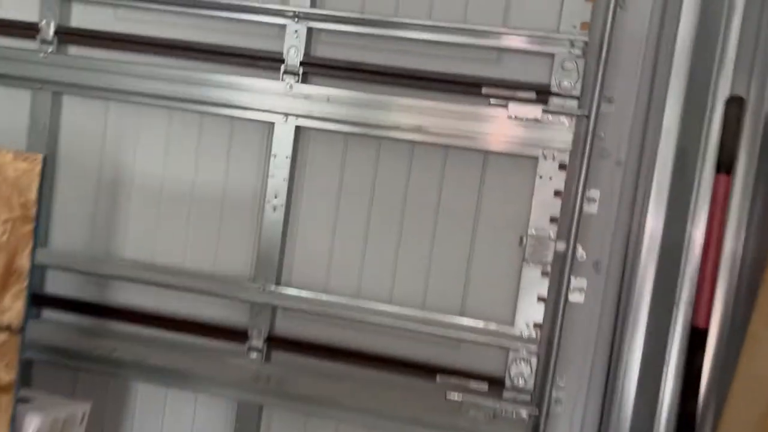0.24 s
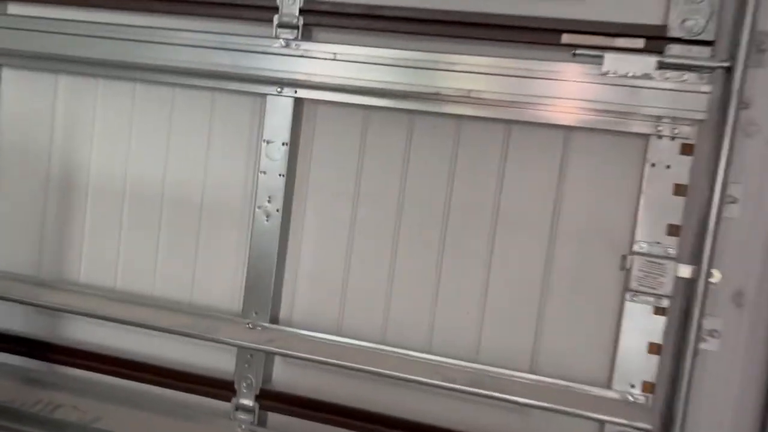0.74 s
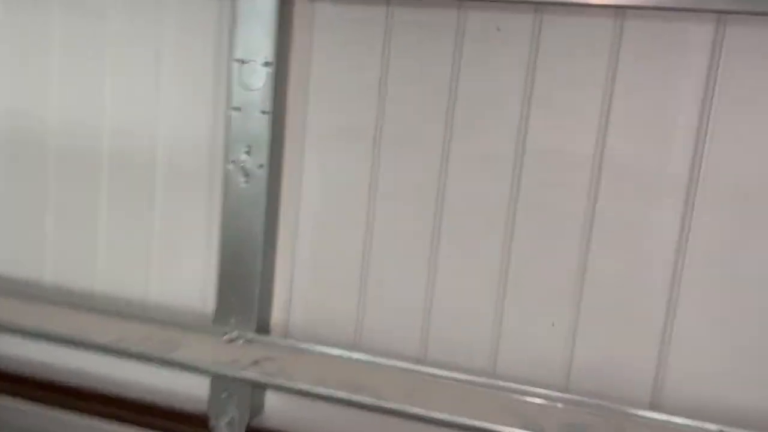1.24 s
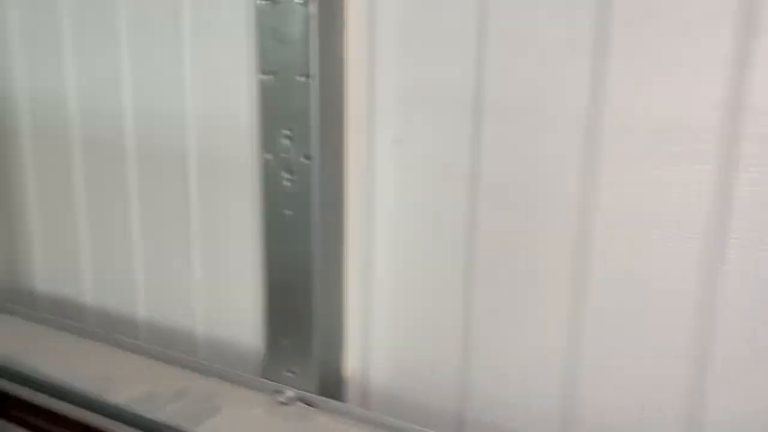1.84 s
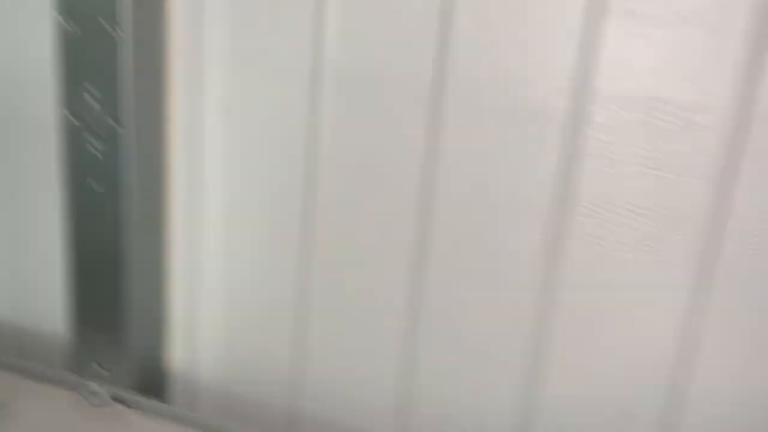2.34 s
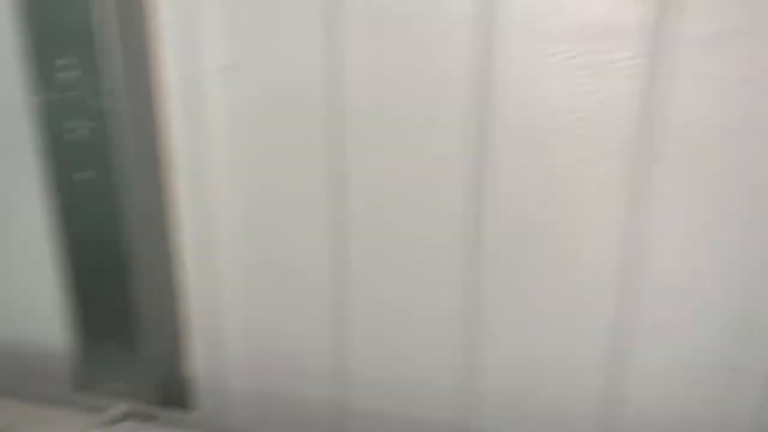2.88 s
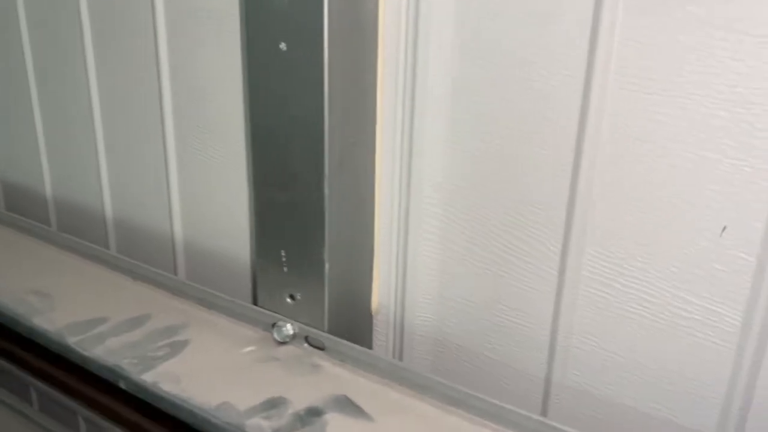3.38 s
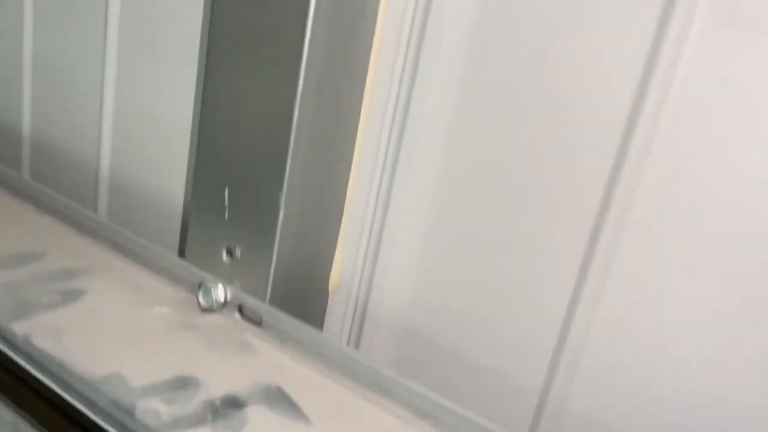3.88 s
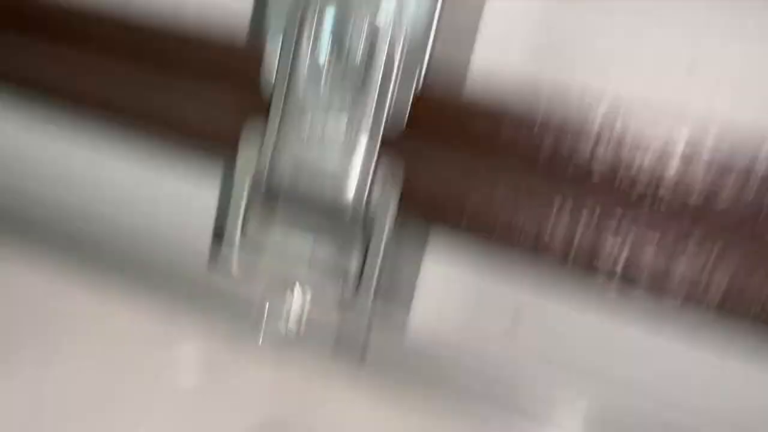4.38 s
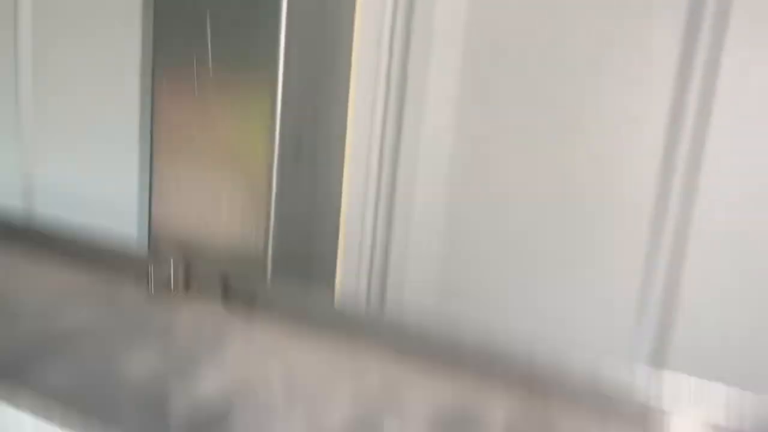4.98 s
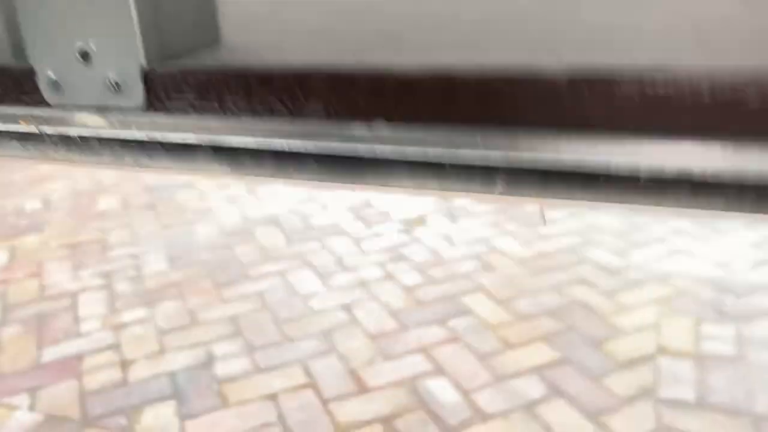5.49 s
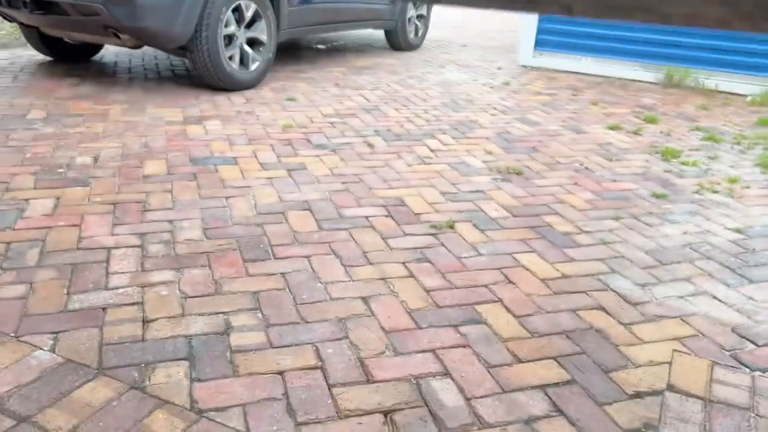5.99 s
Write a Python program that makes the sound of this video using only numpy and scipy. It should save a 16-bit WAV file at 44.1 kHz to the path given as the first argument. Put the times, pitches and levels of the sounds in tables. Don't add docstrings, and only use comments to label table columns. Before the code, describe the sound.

Close handheld stereo capture in a hard, fairly small garage: soft footfalls, clothes rustle and bright key jingles come first. Light bolt knocks lead to one very hard double clank with a short squeal. Then the metal door rolls upward in uneven, rattling lurches, loudest in the middle, with hollow booms, hinge hits and dry squeaks. It quiets to a faint scrape and a few key tinkles before bumping again at the end.

```python
import sys
import numpy as np
from scipy import signal
from scipy.fft import rfft, irfft, next_fast_len
from scipy.io import wavfile
from scipy.ndimage import uniform_filter1d, map_coordinates

SR = 44100
rng = np.random.default_rng(int(sys.argv[2]) if len(sys.argv) > 2 else 0)


def level_to_linear(level):
    exponent = np.asarray(level, float) / 20
    return 10 ** exponent


def to_wav(sig):
    pcm = np.clip(np.atleast_2d(sig), -1, 1) * 32767
    pcm = np.round(pcm).astype(np.int16)
    wavfile.write(sys.argv[1], SR, pcm.T)


N = 274743


def unit(x):
    return x / np.sqrt(np.mean(x ** 2) + 1e-20)


def along(points, hz):
    f, v = np.transpose(points)
    return np.interp(np.log(hz + 1), np.log(f + 1), v)


def wobble(rate_hz):
    knots = rng.standard_normal(int(N * rate_hz / SR) + 4)
    return map_coordinates(knots, [np.arange(N) * rate_hz / SR])


def filtered(x, response):
    size = x.shape[-1]
    m = next_fast_len(size + 4096)
    return irfft(rfft(x, m) * response(np.fft.rfftfreq(m, 1 / SR)), m)[..., :size]


def resonances(modes, f):
    return sum(level_to_linear(2 * db) * (f * w) ** 2 / ((c * c - f * f) ** 2 + (f * w) ** 2 + 1) for c, w, db in modes)


def rush(spectrum, modes=(), bumps=1, size=N, sheet_db=0):
    sheet = level_to_linear(1.6 * sheet_db * np.tanh(rng.standard_normal(SR // 40)))

    def colour(f):
        smooth = np.sqrt(level_to_linear(2 * along(spectrum, f)) + resonances(modes, f))
        return smooth * np.interp(f / 30, np.arange(len(sheet)), sheet)

    return unit(filtered(bumps * rng.standard_normal((2, size)), colour))


def add(track, s, sound):
    part = track[:, round(s * SR):round(s * SR) + sound.shape[1]]
    part += sound[:, :part.shape[1]]


def swells(s, db, t60, rise, hold=0):
    t = np.arange(0, N / SR + .002, .001)[:, None]
    before = np.maximum(s - t, 0) / np.abs(rise)
    after = np.maximum(t - s - np.abs(hold), 0) / np.maximum(t60, .02)
    power = level_to_linear(2 * (db - 60 * (before + after))).sum(axis=1)
    return np.interp(np.arange(N) / SR, t[:, 0], np.sqrt(power))


# frequency in Hz, t60 in s.
GARAGE_T60 = [(200, 0.51), (600, 0.91), (3500, 0.45), (10000, 0.38)]


def garage(x):
    hz, t, z = signal.stft(rng.standard_normal((2, SR // 2)), SR, nperseg=256)
    tail = signal.istft(z * level_to_linear(-60 * t / along(GARAGE_T60, hz)[:, None]), SR, nperseg=256)[1]
    return signal.fftconvolve(x, tail / np.linalg.norm(tail[0]), axes=1)[:, :N]


# time in s, level in dB.
FOOTFALLS = [(0.0, -47.5), (0.11, -39.5), (0.16, -32), (0.36, -43.5), (0.66, -51), (1.32, -52),
             (1.52, -40.5), (1.77, -40.5), (1.87, -39), (1.98, -38.5), (2.09, -42), (3.2, -32)]
# time in s, level in dB, rustle over it in dB, t60 in s.
SCUFFS = [
    (0.0, -55.5, -11.5, 0.84),
    (0.404, -58.5, -6.5, 0.82),
    (0.54, -49, -7, 0.44),
    (0.734, -60, -2, 0.34),
    (1.02, -54, -11.5, 2),
    (1.235, -52.5, 0.5, 0.16),
    (1.83, -51.5, -8, 0.92),
    (1.53, -47, 4, 0.43),
    (1.865, -53, -6, .2),
]
QUIET_DB = (-56.5, -65.5, -70.5)
THUD_T60_S, SETTLE_S, BRUSH_S = 0.4, 0.14, 0.24


def walker():
    s, db = np.transpose(FOOTFALLS)
    when, scuff_db, rustle_db, t60 = np.transpose(SCUFFS)
    thud = swells(s, db, THUD_T60_S, SETTLE_S)
    soles = swells(when, scuff_db, t60, BRUSH_S)
    clothes = swells(when, scuff_db + rustle_db, t60, BRUSH_S)
    return [np.hypot(move, level_to_linear(quiet)) for move, quiet in zip((thud, soles, clothes), QUIET_DB)]


# frequency in Hz, density in dB per Hz.
THUD = [(20, -21), (40, -3), (65, 7.5), (130, -5.5), (200, -19), (350, -52)]
SHUFFLE = [(100, -10), (250, -2), (600, -8.5), (1500, -15), (2500, -32.5)]
RUSTLE = [(900, -27), (2000, 4), (5000, -3.5), (9000, -9.5), (16000, -18.5)]
# time in s, peak in dB.
HEELS = [
    (0.409, -62),
    (0.43, -42),
    (0.519, -38.5),
    (1.018, -36.5),
    (1.119, -37),
    (1.224, -43),
]
HEEL_T60_S = 0.15


def walking():
    thud, shuffle, rustle = walker()
    scuff, t = wobble(29.58), np.arange(SR // 5) / SR
    track = thud * rush(THUD)
    track += shuffle * rush(SHUFFLE, bumps=level_to_linear(3.2 * scuff))
    track += rustle * rush(RUSTLE, bumps=level_to_linear(2.8 * scuff))
    for s, db in HEELS:
        tap = rush([(150, -17), (350, 8), (1100, -6.5), (1600, -40)], size=len(t), sheet_db=8.5)
        tap = level_to_linear(db - 8.0 - 60 * t / HEEL_T60_S) * tap
        grit = level_to_linear(db - 25 - 60 * t / .03) * rush(RUSTLE, size=len(t))
        add(track, s - .002, tap + grit)
    return track


# time in s, peak in dB, low modes in dB, top modes in dB.
JINGLES = [(0.0094, -58, -13, -5), (0.1374, -52, -27, 2), (0.2448, -61, -17, 1), (0.2825, -50, -4, 3),
           (0.406, -33, -18, -15), (0.5566, -44.5, -10, -4), (0.601, -44, -11, 1), (0.6254, -40, -13, 2),
           (0.6639, -50, -21, -15), (0.69, -47, -16, -16), (0.734, -33, -12, -1), (0.77, -38.5, -13, -5),
           (0.7994, -46, -11, -3), (0.855, -37.5, -13.5, -10), (1.0231, -46.5, -22, -2),
           (1.1373, -51, -3, 6.5), (1.201, -51, -2, -15), (1.2942, -45, -6, -10), (1.6584, -57, -14, 3),
           (1.674, -44.5, -12, -15), (1.7746, -29.5, -21, 3), (5.558, -52, -16, -11),
           (5.5792, -55, -5, -11), (5.6665, -51, -17, -10), (5.7219, -48, -12, 4), (5.7728, -59, -6, -7)]
KEY_HZ = [4600, 5850, 6530, 7730, 9150, 9620, 10090, 11320, 11640, 12400, 13280, 13710, 14300, 15080, 15310,
          15690]
# level in dB, t60 in s.
KEY_RING = [(-17, 0.098), (-24, .1), (0.5, 0.072), (-4, 0.091), (-6, 0.089), (-14, 0.1), (1, 0.068),
            (-1, 0.075), (-5, 0.041), (-22, .1), (-2, 0.18), (-4, 0.14), (-19, 0.13), (5.5, 0.2), (-14, .1),
            (-3, 0.19)]


def keys():
    track, t = np.zeros((2, N)), np.arange(SR // 5) / SR
    hz = np.array(KEY_HZ)[:, None]
    level_db, t60 = np.transpose(KEY_RING)[:, :, None]
    for s, db, low_db, top_db in JINGLES:
        size, detune = rng.standard_normal((2, len(hz), 1))
        part_db = np.where(hz < 8500, low_db, np.where(hz > 14700, top_db, 0))
        fade = level_to_linear(part_db + level_db + 3.6 * size - 60 * t / t60)
        ring = (fade * np.sin(2 * np.pi * hz * (1 + 0.0028 * detune) * t)).sum(axis=0)
        ring[:4] += 3.0 * np.array([1, -3, 3, -1])
        spray = level_to_linear(-60 * t / 0.16) * rng.standard_normal((2, len(t))) * (rng.random(len(t)) < .03)
        spray[:, 0] = 1.54
        jingle = signal.fftconvolve(spray, ring[None], axes=1)[:, :len(t)]
        add(track, s - .001, level_to_linear(db - 15.5) * jingle * np.cos(np.pi / 2 * t / t[-1]))
    return track


# time in s, t60 in s, frequency in Hz, width in Hz,
# level in dB.
SQUEAKS = [(2.236, 0.045, 2590, 50, -12), (2.249, 0.046, 5620, 170, -13), (3.077, 0.27, 2794, 140, -31),
           (3.085, .15, 3800, 140, -47), (5.727, 0.35, 290, 38, -24), (3.296, 0.17, 1251, 215, -20.5),
           (2.243, 0.51, 1051, 173, -17), (2.97, 0.53, 560, 51, -26.5), (4.442, 0.073, 5550, 160, -24.5),
           (4.545, 0.19, 2170, 90, -22.5), (4.83, 0.2, 2660, 110, -23.5), (4.89, 1, 2620, 200, -37.5),
           (4.839, 0.16, 3080, 115, -29.5), (5.292, 0.4, 6900, 200, -41), (5.33, 0.29, 7800, 970, -40.5),
           (5.321, 0.18, 4500, 300, -55), (5.435, 0.33, 3050, 45, -51), (5.2, .4, 2330, 50, -47),
           (5.31, 0.26, 1050, 90, -39), (5.0, 0.75, 1100, 190, -33.5), (4.44, .15, 1200, 105, -19.5),
           (1.985, .6, 2000, 90, -42), (4.58, 0.16, 2380, 140, -32), (4.64, 0.67, 3200, 170, -33),
           (4.44, 0.3, 800, 120, -17), (4.721, .2, 3150, 170, -27), (4.77, 0.27, 1350, 66, -21),
           (4.79, 0.072, 5300, 69, -30.5), (4.8, 0.11, 3100, 150, -27), (4.9, 0.077, 2300, 40, -35),
           (5.155, 0.088, 4480, 40, -52), (4.455, .3, 2620, 60, -26), (5.28, 0.29, 4650, 150, -54),
           (5.335, .2, 4200, 149.5, -48), (5.331, .1, 7750, 40, -42), (5.8, 0.072, 6850, 40, -42),
           (1.455, 0.052, 2210, 170, -30.5), (1.455, 0.05, 1355, 89, -30.5), (1.5, 0.12, 880, 91, -30),
              (1.52, 0.094, 1880, 130, -30.5), (1.52, .05, 700, 140, -31.5), (1.45, .05, 570, 90, -27),
              (1.862, .08, 600, 90, -45), (1.862, .07, 1300, 120, -51), (1.976, .12, 770, 75, -27.5),
              (1.976, .1, 1020, 61, -32.5), (2.05, .25, 1600, 70, -40), (2.12, 0.23, 1050, 54, -35.5),
              (2.008, .15, 760, 120, -32), (2.038, 0.11, 740, 98, -33), (2.226, 0.09, 2600, 60, -18),
              (2.254, 0.036, 2586, 49, -10), (2.263, 0.023, 5700, 200, -16.5), (2.252, 0.18, 804, 70, -14),
              (2.282, 0.21, 620.5, 40, -11.5), (2.305, 0.27, 478, 45, -18.5)]
SLIP_RISE_S, SAG_PER_S = 0.012, 0.0303


def squeaks():
    track, t = np.zeros((2, N)), np.arange(SR // 2) / SR
    for s, t60, hz, width_hz, db in SQUEAKS:
        fade = level_to_linear(db - 60 * np.maximum(t - SLIP_RISE_S, 0) / t60)
        swell = np.minimum(t / SLIP_RISE_S, 1) * fade
        drift = np.cumsum(rng.standard_normal((2, len(t))), axis=1) * np.sqrt(2 * np.pi * width_hz / SR)
        add(track, s, swell * np.sin(2 * np.pi * hz * t * (1 - SAG_PER_S * t / 2) + drift))
    return track


# time in s, peak in dB, knock in dB, edge in dB.
BOLT_CLANKS = [(1.451, -29, 4, -28.5), (1.4646, -27.5, 1, -36), (1.51, -26, 2.5, -28),
               (1.529, -23, -1, -27), (1.8569, -45, 6, -32), (1.981, -30, 10, -31.5),
               (2.0534, -22, -5, -30.5), (2.222, -4.5, 2, -30), (2.2467, 0, 5.5, -28.5),
               (2.263, -7.5, 8.5, -9.5), (2.276, -9, -15, -20), (2.6594, -43, 19, -20.5)]
# time in s, peak in dB, knock in dB, edge in dB.
HINGE_CLANKS = [(2.9873, -25, 8, -15), (3.164, -30.5, -5, -30.5), (3.275, -34.5, 4, -43),
                (3.3064, -32, 20.5, -40), (3.351, -21, -15, -19), (3.5877, -29, 1, -33),
                (3.7594, -28.5, 23, -22), (3.916, -37, 9, -27), (4.121, -17.5, 6.5, -33),
                (4.4445, -17, 5, -17), (4.5526, -22, 14, -31), (4.6406, -16, 7.5, -37.5),
                (4.769, -6.5, -4, -26), (4.8098, -20.5, 10.5, -32.5), (4.962, -46, -10, -18),
                (5.029, -45, -10, -24), (4.996, -52, -4, -32), (5.093, -40, -10, -24),
                (5.164, -42, -10, -12), (5.2457, -43, 26, -21.5), (5.721, -24.5, -9, -21.5),
                (5.774, -26.5, -15, -28), (5.8175, -29, -14, -28), (5.877, -40.5, 9, -33),
                (6.0382, -51, 13, -24), (6.161, -35.5, 20, -31), (6.2058, -37, 16, -41)]
CLANK_T60_S, HARD_S_PER_DB, STRONG_S_PER_DB = 0.14, 0.07, -0.02


def clanks():
    track, t = np.zeros((2, N)), np.arange(SR // 5) / SR
    for s, db, knock_db, edge_db in BOLT_CLANKS + HINGE_CLANKS:
        t60 = CLANK_T60_S - HARD_S_PER_DB * (edge_db + 29.0) + STRONG_S_PER_DB * (db + 25.5)
        fade = level_to_linear(db - 13.5 - 60 * t / max(t60, .02)) * (1 - np.exp(-t / 0.00046))
        fade = fade * np.cos(np.pi / 2 * t / t[-1])
        bright = rush([(1200, -18), (2200, 1.0), (8000, -2.0), (10000, -36)], size=len(t), sheet_db=4.0)
        edge = rush([(7000, -14.0), (9000, -0.5), (11500, -2.5), (16000, -19.0)], size=len(t))
        knock = rush([(150, -36), (400, -6.0), (700, 11.5), (1200, 5.5), (1800, -50)],
                     size=len(t), sheet_db=3.0)
        add(track, s - .002, fade * (bright + level_to_linear(edge_db + 21.5) * edge + level_to_linear(knock_db + 1) * knock))
    return track


# time in s, peak in dB, frequency in Hz.
BUMPS = [(2.947, -25, 460), (2.974, -18.5, 505), (3.02, -19.5, 525), (3.125, -25, 560), (3.208, -23.5, 750),
         (3.303, -14.5, 1002), (3.356, -18, 767), (3.476, -20, 557), (3.564, -15.5, 503), (3.624, -20, 511),
         (3.65, -17, 583), (3.699, -23, 580), (3.76, -12.5, 557), (3.835, -13.5, 519), (3.919, -13, 522),
         (4.019, -16, 638), (4.07, -9.5, 603), (4.28, -13, 416), (4.352, -10, 617), (4.446, -8, 511),
         (4.532, -9, 654), (4.636, -10.5, 745), (4.729, -12.5, 716), (4.805, -12.5, 635), (4.978, -19, 650),
         (5.189, -25, 620), (5.234, -24, 754), (5.358, -29, 1037), (5.418, -38, 474), (5.445, -33, 563),
         (5.527, -31, 563), (5.729, -30, 401), (5.754, -29, 519), (5.783, -27, 401), (5.808, -26, 549),
         (5.854, -21, 674), (5.877, -21, 452), (5.913, -17, 641), (5.983, -16.5, 533), (6.006, -17, 410),
         (6.045, -16, 670), (6.107, -14, 716), (6.16, -16, 522), (6.204, -11.5, 471)]
BUMP_DB, BUMP_T60_S, BUMP_SPREAD = -6.5, 0.05, .35


def bumps():
    track, t = np.zeros((2, N)), np.arange(SR // 5) / SR
    for s, db, hz in BUMPS:
        near, turn = rng.standard_normal((2, 2, 4, 1))
        spread = BUMP_SPREAD * np.tanh(near[0]) * np.arange(4)[:, None] / 2
        ring = np.sin(2 * np.pi * hz * np.exp(spread) * t + 0.38 * turn).sum(axis=1)
        fade = level_to_linear(db + BUMP_DB - 60 * t / BUMP_T60_S) * (1 - np.exp(-t / 0.0012))
        add(track, s - .0015, fade * ring)
    return track


def clatter(count, centre_hz, cycles):
    when, pitch = rng.random(count) * N, rng.standard_normal(count)
    size_db = 3 * np.minimum(rng.exponential(size=count), 3)[:, None]
    hz, t = centre_hz * np.exp(.5 * np.tanh(pitch))[:, None], np.arange(SR // 50) / SR
    ring = np.exp((2j * np.pi - np.log(1000) / cycles) * hz * t)
    tone = level_to_linear(size_db) * ring * np.sin(np.pi * t / t[-1]) ** .5
    where = (when.astype(int)[:, None] + np.arange(len(t))).ravel()
    return unit(np.array([np.bincount(where, part.ravel(), N)[:N] for part in (tone.real, tone.imag)]))


JOLT_RISE_S, GRIT_LASTS, FRAME_LASTS = 0.025, 0.57, 1.35


def jolted(s, hold, db, grit_db, t60, frame_db):
    shares = (frame_db, FRAME_LASTS), (0, 1), (grit_db, GRIT_LASTS)
    return np.array([swells(s, db + more_db, lasts * t60, JOLT_RISE_S, hold) for more_db, lasts in shares])


# time in s, shake in dB, panel sway in dB.
HEAVE = [(2.3, -26, -53), (2.72, -26.5, -35.5), (2.95, -34, -41), (2.99, -36, -29), (3.275, -32.5, -32),
         (3.33, -25, -21.5), (3.77, -26, -27.5), (3.86, -23.5, -21.5), (4.07, -21, -17),
         (4.42, -19.5, -18.5), (4.52, -15.5, -13), (4.82, -25, -14), (5.28, -35, -29), (5.7, -51, -40),
         (5.735, -39, -28), (5.849, -34.5, -32.5), (5.88, -28.5, -30), (6.23, -20.5, -26.5)]
# time in s, hold in s, level in dB, t60 in s.
SLAM = (2, 0, -33.5, 0.6)
# time in s, hold in s, level in dB.
RUBS = [
    (3.336, 1.26, -48),
    (5.057, 0.494, -61),
]
# time in s, hold in s, level in dB, grit in dB, t60 in s.
THROWS = [
    (1.464, 0.081, -34, -11, .1),
    (1.981, .02, -43.5, -2, .6),
    (2.07, .04, -40, -5, .45),
    (2.225, 0.022, -26, -3, 0.066),
    (2.254, 0.015, -21, 1, 0.41),
]
# time in s, level in dB, grit in dB, t60 in s.
JOLTS = [(2.985, -40.5, 0, .4), (3.2, -45, -15, 1), (3.354, -30, -3, 0.62), (3.58, -40, -8, 1),
         (3.77, -43, -9, 0.98), (3.88, -37, -7, .7), (4.125, -32, -12, 0.61), (4.447, -25, -2, 0.5),
         (4.555, -29, -18, 0.55), (4.64, -29.5, -16, 1), (4.778, -29, -2, 0.36), (5.31, -51.5, 6, 1),
         (5.874, -31.5, -31, 0.27), (6.055, -41.5, -5, 1), (6.2, -35, -31, .5)]
RATTLE_DB, RATTLE_GROWS, DOWN_DB = -45, 1.18, -2
RUB_RISE_S, RUB_T60_S, JOLT_HOLD_S = 0.18, 0.15, 0.012
THROW_FRAME_DB, JOLT_FRAME_DB = 3, 2.5


def drive(lifted):
    s, shake_db, sway_db = np.transpose(HEAVE)
    shake, sway = (np.interp(np.arange(N) / SR, s, c, left=-140) for c in (shake_db, sway_db))
    at, hold, db, t60 = SLAM
    frame = np.hypot(level_to_linear(shake), swells(at, db, t60, JOLT_RISE_S, hold))
    rollers = level_to_linear(RATTLE_DB + RATTLE_GROWS * (shake + 26) + DOWN_DB * ~lifted)
    start, drag, rub_db = np.transpose(RUBS)
    rub = swells(start, rub_db, RUB_T60_S, RUB_RISE_S, drag)
    when, *shock = np.transpose(JOLTS)
    throws = jolted(*np.transpose(THROWS), THROW_FRAME_DB)
    jolts = jolted(when, JOLT_HOLD_S, *shock, JOLT_FRAME_DB)
    return level_to_linear(sway), *np.sqrt(np.array([frame, rollers, rub]) ** 2 + throws ** 2 + jolts ** 2)


# frequency in Hz, width in Hz, level in dB.
PANEL_MODES = [(66.4, 6.8, -0.5), (111.7, 12, -7.5), (139.3, 3.2, -5.5), (163.8, 6.8, -7.5),
               (191, 6.4, -7.5), (212.1, 4.1, -5.5)]
FRAME_MODES = [(319, 30, 5), (394, 12, -14), (515, 5.2, 5.5), (561.4, 13, 4), (700, 23, -16),
               (836, 20, -17), (1167, 40, -7), (1433, 40, -17)]
BOLT_MODES = [(257, 63, -7.5), (323, 20, -7), (440, 10, 3), (512, 7.1, 2), (557, 9.1, 6.5), (770, 42, -5),
              (800, 49, -10.5)]
TRACK_MODES = [(1950, 33, 2), (2200, 14, -3), (2265, 14, 1), (2460, 26, -3), (2600, 16, -5), (3100, 28, -8),
               (3530, 19, -4)]
# frequency in Hz, density in dB per Hz.
BOOM = [(20, -48), (35, -53), (55, -11), (240, -17), (330, -19.5), (500, -117)]
DRUM = [(120, -62), (230, 1), (700, 1), (1350, -13), (1600, -33), (2600, -93)]
SHUT = [(120, -19), (230, -5), (600, 3), (900, -9.5), (1200, -22.5), (2600, -76)]
RATTLE = [(800, -27), (1400, 4), (1750, -1.5), (2500, -2), (3500, -7.5), (4500, -12), (6500, -45)]
HISS = [(2500, -8), (4200, 5), (5500, 1.5), (8000, 3), (11000, -1.5), (14000, -9), (16000, -11)]
LIFT_S = 2.972


def door():
    joints, grit, chatter = wobble(18), wobble(90), wobble(500)
    lifted = np.arange(N) / SR > LIFT_S
    boom_gain, frame_gain, roller_gain, rub_gain = drive(lifted)
    panels = rush(BOOM, PANEL_MODES, level_to_linear(1.2 * joints))
    raised = rush(DRUM, FRAME_MODES, level_to_linear(1.13 * joints + 1.24 * grit), sheet_db=2.5)
    down = rush(SHUT, BOLT_MODES, level_to_linear(0.95 * grit), sheet_db=1.0)
    loose = np.where(lifted, 1, .4) * clatter(count=1100, centre_hz=707.7, cycles=90)
    frame = unit(np.where(lifted, raised, down) + level_to_linear(-5.5) * loose)
    rollers = rush(RATTLE, TRACK_MODES, level_to_linear(1.03 * joints + 0.51 * grit + 1.35 * chatter), sheet_db=3.0)
    rub = rush(HISS, bumps=level_to_linear(1.0 * joints + 1.6 * grit + 1.3 * chatter), sheet_db=5.0)
    return boom_gain * panels + frame_gain * frame + roller_gain * rollers + rub_gain * rub


def scene():
    hits, slips, jingle = clanks() + bumps(), squeaks(), keys()
    room = garage(level_to_linear(-14.5) * hits + level_to_linear(-13) * slips + level_to_linear(-13.0) * jingle)
    return room + walking() + jingle + slips + hits + door()


WEAK_DB, MASKED_DB, MASKED_SHARE, TOP_HZ = -7.5, -29, .5, 15850


def thinned(pair):
    hz, _, z = signal.stft(np.pad(pair, ((0, 0), (691, 0))), SR, nperseg=2048)
    power = uniform_filter1d(np.abs(z) ** 2, size=16, axis=1)
    narrow = uniform_filter1d(np.abs(z) ** 2, size=8, axis=1)
    high = hz > 6000
    treble = power[:, high].sum(axis=(0, 1))
    attack = treble > 2.8 * np.roll(treble, 1)
    fading = treble < .6 * np.roll(treble, 4)
    patches = np.kron(rng.random((130, 140)) < MASKED_SHARE, np.ones((8, 2), bool))[:len(hz), :len(attack)]
    weak = (power < level_to_linear(2 * WEAK_DB) * power[::-1]) & high[:, None] & ~attack
    masked = narrow < level_to_linear(2 * MASKED_DB) * power[:, high].max(axis=(0, 1))
    weak |= masked & (hz > 2500)[:, None] & ~attack & patches
    weak |= (hz > 12200)[:, None] & fading & patches
    kept = z * ~weak * (hz < TOP_HZ)[:, None]
    return signal.istft(kept, SR, nperseg=2048)[1][:, 691:N + 691]


def top_cut(x):
    return signal.sosfilt(signal.butter(12, 16060, fs=SR, output="sos"), x)


# frequency in Hz, likeness from 0 to 1.
ALIKE = [(200, 1), (400, 0.84), (750, 0.57), (1500, 0.45), (6000, 0.27), (6650, 1), (7300, 0.65),
         (8300, 0.27)]
# frequency in Hz, lead in radians.
LEAD = [(100, -0.29), (500, -0.17), (1500, -1.2), (2100, -0.13), (3500, -1.52), (5200, -0.15), (5900, 0.99),
        (7400, -0.079)]
# frequency in Hz, difference in dB.
LEFT = [(60, -1), (290, 0.5), (1400, 2), (3100, 1.5), (8000, 2)]


def record(dry):
    def path(hz):
        return 2 * np.pi * np.maximum(hz - 7100, 0) / 4830

    def split(hz):
        locked = np.where(hz < 8300, along(ALIKE, hz), .998 - .3 * np.sin(path(hz)) ** 4)
        turn = np.arccos(np.clip(locked, 0, 1)) / 2
        return np.array([np.cos(turn), np.sin(turn)])

    def port(hz):
        lead = along(LEAD, hz) + path(hz) - .4 * np.sin(2 * path(hz))
        return (level_to_linear(along(LEFT, hz) / 2) * np.exp(.5j * lead)) ** np.array([[1], [-1]])

    shared, apart = filtered(dry, split)
    ports = filtered(np.array([shared + apart, shared - apart]), port)
    left, right = ports / (1 + np.abs(ports) ** 6) ** (1 / 6)
    mid, side = thinned(np.array([left + right, left - right]) / 2)
    return top_cut(np.array([mid + side, mid - side]))


dry = scene()
out = record(dry)
to_wav(out)
```